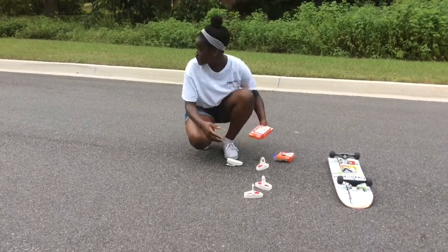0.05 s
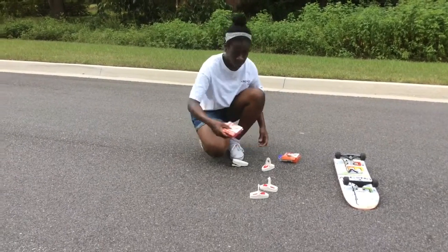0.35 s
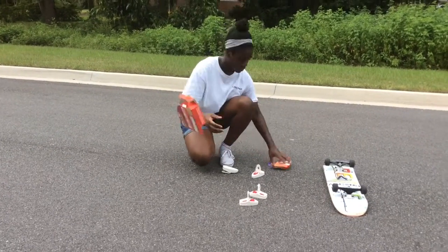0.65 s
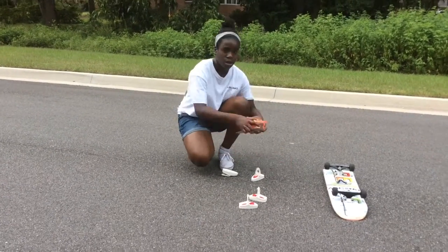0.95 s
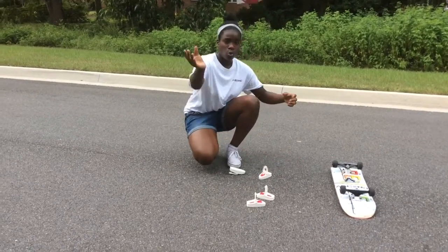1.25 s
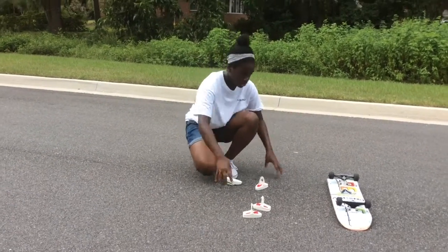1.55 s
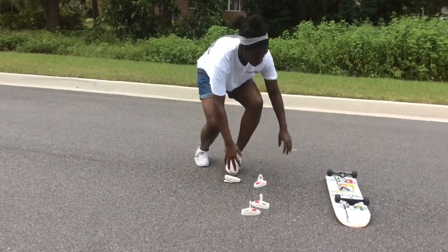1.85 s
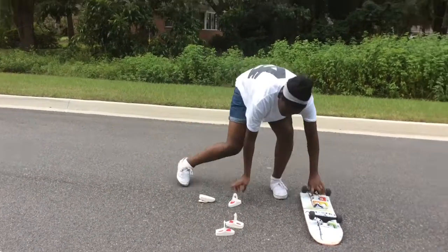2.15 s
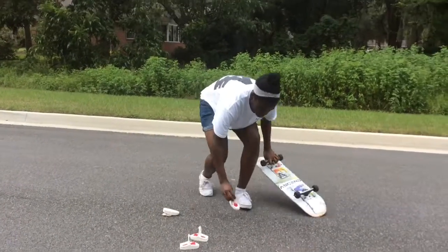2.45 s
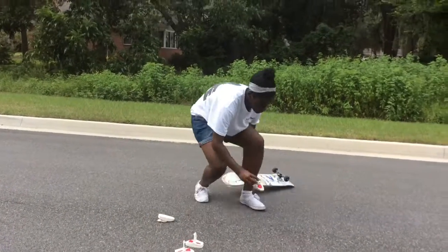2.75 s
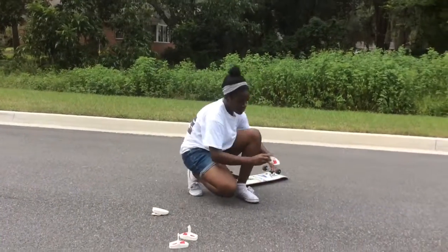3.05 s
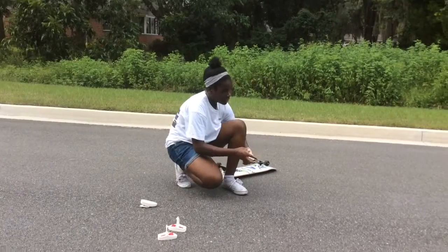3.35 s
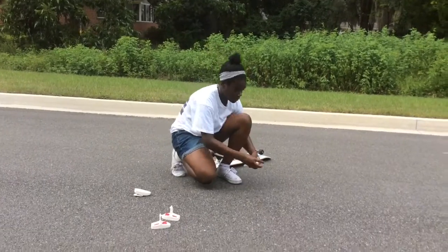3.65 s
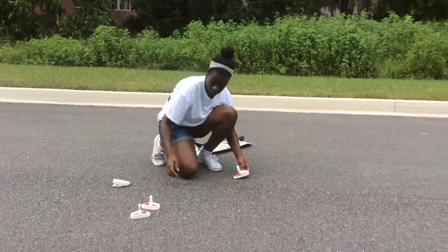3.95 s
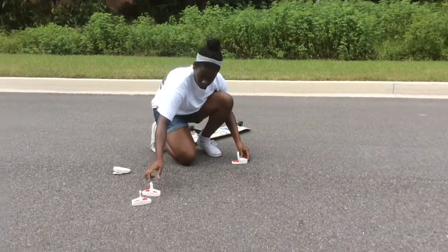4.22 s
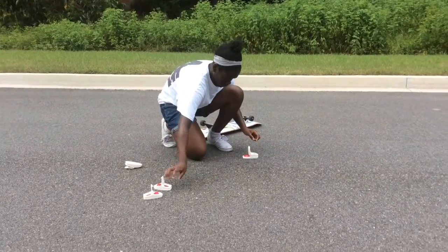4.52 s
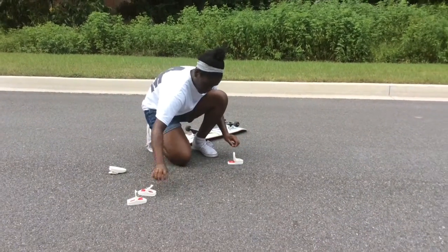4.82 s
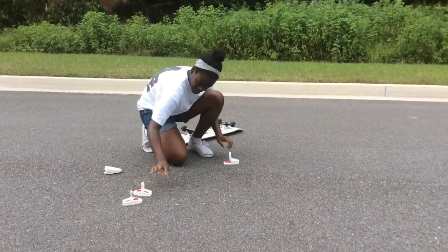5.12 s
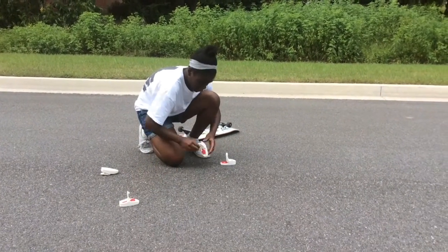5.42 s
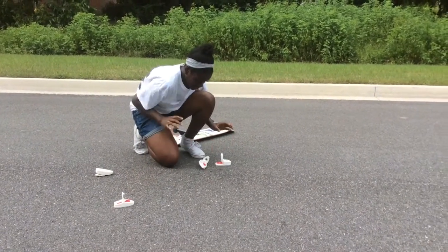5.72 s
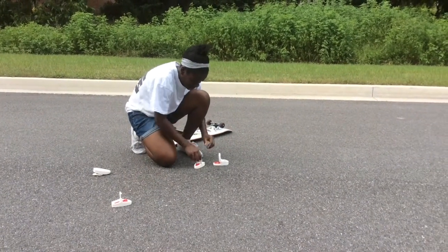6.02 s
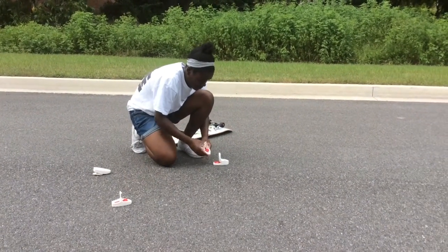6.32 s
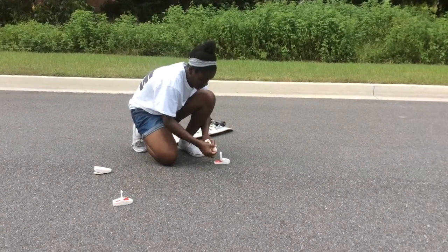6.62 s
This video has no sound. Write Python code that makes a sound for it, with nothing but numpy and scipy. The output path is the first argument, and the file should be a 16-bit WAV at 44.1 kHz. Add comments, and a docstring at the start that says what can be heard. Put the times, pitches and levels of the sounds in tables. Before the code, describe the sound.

On a quiet asphalt road, a few metres from the microphone, packets and plastic snap traps rattle briefly. Two empty packets land and bounce, one after the other. Shoes scuff faintly, then a skateboard is dragged with a gritty scrape and set down with a ringing knock. The traps then give scattered sharp clicks as they are handled. Distant traffic, a low engine hum and shrill insects continue underneath.

```python
"""A quiet asphalt road, a phone's microphone a few metres from someone crouching to lay out snap traps.
Far traffic, a low engine hum and insects in the verge are there from start to end. Packets and plastic
traps rattle as they are picked up, and two empty packets, tossed aside, land and bounce. Shoes scuff,
then a skateboard is dragged away, stones jolting its deck, and is set down near 3 s. From there on the
traps click as they are handled, each contact ringing shell and spring."""
import sys
import numpy as np
from scipy import signal
from scipy.fft import rfft, irfft
from scipy.io import wavfile
from scipy.ndimage import uniform_filter1d

SR = 44100
rng = np.random.default_rng(int(sys.argv[2]) if len(sys.argv) > 2 else 0)


def dump_mix(stems):
    """Bounce the given channels to the path in sys.argv[1] as a 16-bit WAV at rate SR."""
    frames = np.atleast_2d(stems).T  # one column per channel
    limited = np.clip(frames, -1, 1)  # hard clip at full scale
    pcm = np.round(limited * 32767).astype(np.int16)
    wavfile.write(sys.argv[1], SR, pcm)


N = 298998
TIME = np.arange(N) / SR

# colour of a bare contact with the road, for shoes and skateboard: f/Hz, level/dB
ROAD_CONTACT = [(120, -24), (300, -11), (900, 4), (2700, -5), (3300, -9), (5000, -13.5), (5900, -27),
                (7000, -21), (9000, -24.5), (11000, -37), (15500, -42)]


def undb(db):
    """Decibels to gain."""
    return 10 ** (np.asarray(db) / 20)


def unit(x):
    """Scale to rms 1."""
    return x / np.sqrt(np.mean(x ** 2))


def bump(s, half_length):
    """A smooth rise and fall about time s, top 1."""
    return np.exp(-((TIME - s) / half_length) ** 2)


def swells(table):
    """The rise in dB that a list of swells gives."""
    return sum(db * bump(s, half_length) for s, half_length, db in table)


def walk(rate):
    """Random levels held 1 / rate s and smoothed twice; spread near 1."""
    hold = int(SR / rate)
    steps = np.repeat(rng.standard_normal(N // hold + 1), hold)
    return 1.197 * uniform_filter1d(uniform_filter1d(steps, hold), hold)[:N]


def response(colour, modes=(), modes_db=0, tilt_db=0, size=4096):
    """Causal response of unit energy: a broad colour with resonances on it, tilted per octave."""
    hz = np.maximum(np.fft.rfftfreq(size, 1 / SR), 1)
    points, db = np.transpose(colour)
    power = undb(np.interp(np.log(hz), np.log(points), db)) ** 2
    for centre, width, mode_db in modes:
        power += undb(mode_db + modes_db) ** 2 / (1 + 2 * ((hz - centre) / width) ** 2) ** 2
    octaves = np.log2(np.clip(hz, 500, 9000))
    cepstrum = irfft(np.log(power) / 2 + np.log(undb(tilt_db * octaves)))
    cepstrum[1:size // 2] *= 2  # fold to minimum phase
    cepstrum[size // 2 + 1:] = 0
    ring = irfft(np.exp(rfft(cepstrum)))
    return ring / np.linalg.norm(ring)


def through(x, ring):
    """Play x through a response."""
    return signal.fftconvolve(x, ring)[:len(x)]


def band(x, low_hz, high_hz, order=3):
    """Band-pass."""
    sos = signal.butter(order, [low_hz, min(high_hz, .45 * SR)], "band", fs=SR, output="sos")
    return signal.sosfilt(sos, x)


def noise(colour):
    """Steady noise of a given colour, rms 1."""
    return unit(through(rng.standard_normal(N), response(colour)))


def grains(count, spread_db):
    """Dense tiny grains of uneven size, rms 1."""
    return unit(rng.standard_normal(count) * undb(spread_db * np.clip(rng.standard_normal(count), -2, 2)))


def contacts(table, colour, modes, modes_db, ring_db, ring_width_hz, peak, spread_db, fall, size=16384):
    """Softened clicks: each a grainy swell that rises to one peak, fades about as fast, rings the body."""
    out = np.zeros(N + 2 * size)
    t = (np.arange(size) - size // 2) / SR
    for s, db, tilt_db, rise_ms, ring_hz in table:
        slope_s = rise_ms / 1000 * np.where(t < 0, 1, fall)  # fall is decay time over rise time
        click = grains(size, spread_db) * np.exp(-np.abs(t) / slope_s)
        click[size // 2] += peak * np.linalg.norm(click)
        # the point of contact decides which resonance is struck hardest
        body = response(colour, [*modes, (ring_hz, ring_width_hz, ring_db)], modes_db, tilt_db)
        start = int(s * SR)
        out[start:start + size] += undb(db) * through(click, body)
    return out[size // 2:size // 2 + N]


def traffic():
    """Far roads rumble and hiss as vehicles pass; one engine hums with a wavering pitch."""
    # the engine hum swells: t/s, half length/s, rise/dB
    engine_swells = [(1.15, 0.5, 10), (3.9, 0.6, 6), (5.15, 0.47, 9)]
    # vehicles at their nearest: t/s, half length/s, rumble rise/dB, tyre rise/dB
    passes = [(0.536, 0.95, 7.5, 5), (6.35, 0.59, 1.5, 2.06)]
    # colours of the rumble and of the tyres from far off: f/Hz, level/dB
    rumble_colour = [(20, -17), (32, -12.5), (48, -3.5), (65, -3), (85, 0), (115, -1.5), (150, -12),
                     (220, -18.5), (400, -54.5)]
    tyre_colour = [(70, -26), (130, -3.5), (190, -4.5), (290, -10.5), (420, -12), (560, -13.5), (750, -9),
                   (1050, -9.5), (1800, -13.5), (2660, -20.5), (3600, -23.5), (5000, -21.5), (7000, -31),
                   (9100, -71)]
    engine_hz = 81.3 * (1 + 0.0316 * walk(9))
    phase = 2 * np.pi * np.cumsum(engine_hz) / SR
    engine = np.sin(phase) * undb(-64.5 + swells(engine_swells) + 2 * walk(9))
    rumble_rise = swells([(s, half, db) for s, half, db, _ in passes])
    tyre_rise = swells([(s, half * 1.77, db) for s, half, _, db in passes])  # tyres stay audible longer
    rumble = noise(rumble_colour) * undb(-61 + rumble_rise + walk(8))
    tyres = noise(tyre_colour) * undb(-62 + tyre_rise + 0.35 * walk(4.5))
    return engine + rumble + tyres


def insects():
    """A shrill, throbbing chorus in the verge; one insect nearer the microphone lisps in fading runs."""
    # colour of the chorus: f/Hz, level/dB
    chorus_colour = [(5500, -28), (7000, -17.5), (7800, -9), (8350, -0.5), (8850, -8), (9450, -6.5),
                     (10100, -20), (11500, -32), (15000, -57.5)]
    # the chorus swells: t/s, half length/s, rise/dB
    chorus_swells = [(0.45, 0.7, 5), (1.85, 0.32, 5), (4.75, 0.11, 2.5)]
    # the nearer insect's runs: t/s, length/s, stroke period/s, first stroke's level/dB
    lisp_runs = [(1.926, 0.28, 0.11, -69), (3.354, 0.88, 0.13, -59), (4.932, 0.22, 0.145, -65)]
    chorus_db = -62.5 + swells(chorus_swells)
    chorus = noise(chorus_colour) * undb(chorus_db + 0.87 * walk(45))
    core = unit(band(rng.standard_normal(N), 8000, 8570, order=2))
    throb = core * undb(chorus_db - 11.5 + 4 * walk(25))
    fade_db_per_s = 11
    strokes = sum(undb(db - fade_db_per_s * after) * bump(s + after, half_length=0.032)
                  for s, length, period, db in lisp_runs for after in np.arange(0, length, period))
    lisps = strokes * unit(band(rng.standard_normal(N), 6450, 8000, order=2))
    return chorus + throb + lisps


def packets():
    """Two empty packets are picked up and tossed; they ring briefly as they land and bounce."""
    # packet contacts: t/s, level/dB, tilt/(dB per octave), rise/ms, struck resonance f/Hz
    hits = [(0.004, -44, 7, 9.2, 2300), (0.042, -46, 2, 12.5, 1055), (0.727, -53.5, 1, 17.8, 3150),
            (0.872, -25, 0.6, 7.9, 2570), (0.898, -23, 1.6, 6.3, 2100), (0.918, -40.5, -1, 15, 1390),
            (0.960, -49.5, 0, 6.9, 2400), (1.150, -56, -5, 8.2, 3170), (1.657, -41, 13, 9, 8000),
            (1.676, -24.5, 1.4, 11.4, 1210), (1.687, -29.5, 4.5, 9.6, 7840), (1.775, -46.5, 2, 13, 2150)]
    # colour of the bare contact: f/Hz, level/dB
    colour = [(100, -10.5), (300, -6.5), (800, -2.5), (1150, 4), (2700, -3.5), (5200, -4), (6500, -9),
              (9400, -13.5), (10600, -33), (15500, -46)]
    # resonances of a packet: f/Hz, width/Hz, level/dB
    modes = [(423, 200, -4.5), (553, 190, -5), (1076, 260, 0.5), (1480, 540, -3), (2480, 260, 5.5),
             (3230, 350, 3.5), (4897, 380, -3.5), (7690, 420, -31)]
    return contacts(hits, colour, modes, modes_db=-1, ring_db=4, ring_width_hz=370,
                    peak=0.13, spread_db=5, fall=1.32)


def traps():
    """Plastic snap traps click in the hand, each contact ringing shell and spring."""
    # trap contacts: t/s, level/dB, tilt/(dB per octave), rise/ms, struck resonance f/Hz
    clicks = [(0.042, -38.5, 8.5, 11.6, 2410), (0.147, -41.5, 0.7, 18, 4430), (0.180, -39, 2.5, 10.7, 3310),
              (3.120, -57, 3, 14.2, 3280), (3.184, -50.5, 4.5, 18.5, 3260), (3.604, -42, 6, 11.7, 6980),
              (4.242, -36, -1, 8.7, 4110), (4.256, -54, 0, 19, 2290), (4.385, -57.5, -5, 18, 4450),
              (4.452, -57.5, -2, 8.8, 2553), (4.985, -59.5, -4, 11, 3430), (5.307, -48.5, 2, 15, 7140),
              (5.350, -59.5, 1, 12.5, 3300), (5.535, -48, 3, 14, 6630), (5.610, -57, 3.5, 23, 4160),
              (5.670, -54.5, 3, 15, 4960), (5.730, -43.5, 5, 15, 2520), (5.753, -28.5, 1.6, 9.3, 5046),
              (5.771, -35, 3.5, 15, 5160), (5.812, -50, 2, 16, 5000), (5.876, -38.5, 2, 13, 3387),
              (5.915, -50, 1.5, 14, 3550), (6.263, -51.5, 9, 14, 4530), (6.365, -61, 5, 11, 4560),
              (6.648, -44.5, 6.5, 13.6, 2550), (6.740, -46.5, 5.5, 13.4, 6700)]
    # colour of the bare contact: f/Hz, level/dB
    colour = [(200, -16.5), (600, -22), (1000, -16), (1650, -13.5), (2200, -2.5), (5200, 3), (6000, -9),
              (6900, -3), (9400, -8), (10500, -19.5), (13000, -19.5), (15500, -30.5)]
    # resonances of shell and spring: f/Hz, width/Hz, level/dB
    modes = [(2381, 488, 0.5), (2500, 130, -4), (3250, 290, -1), (4400, 320, -10), (4700, 253, -1),
             (5110, 316, -1), (6600, 440, -5.5), (8137, 470, -2.5), (8940, 580, -6.5)]
    return contacts(clicks, colour, modes, modes_db=5, ring_db=9.5, ring_width_hz=128,
                    peak=0.13, spread_db=3.5, fall=1.115)


def shoes():
    """Shoes shift on the asphalt: faint, short scuffs that hardly ring."""
    # scuffs: t/s, level/dB, tilt/(dB per octave), rise/ms, resonance f/Hz
    scuffs = [(1.965, -57.5, 5.5, 20, 3300), (2.030, -63, 5, 19, 2500), (2.085, -52, -9.5, 11, 600)]
    return contacts(scuffs, ROAD_CONTACT, modes=(), modes_db=-3, ring_db=-10.5, ring_width_hz=300,
                    peak=0.1, spread_db=2.5, fall=1)


def board_drag():
    """The skateboard grinds over asphalt: stones jolt the deck; boom and grit follow the pull's speed."""
    # colour of the scrape: f/Hz, level/dB
    colour = [(100, -40), (170, -12.5), (235, 2), (340, -2), (470, -7.5), (1030, 2), (1500, -5.5),
              (2690, -2), (2950, -6), (5100, -13), (5900, -22.5), (8600, -22.5), (11400, -42),
              (15400, -43.5)]
    # resonances of the dragged deck: f/Hz, width/Hz, level/dB
    modes = [(272, 95, -2), (614, 143, 1.5), (750, 47, 2), (1040, 130, -7.5), (1710, 35.6, 3),
             (1920, 83, 3.5), (2174, 72, 5.5), (2670, 66, 3.5), (4950, 320, -11), (8340, 330, -17)]
    # the board catches and one resonance sings out: t/s, f/Hz, width/Hz, level/dB, half length/ms
    catches = [(2.335, 1775, 1800, -43, 10), (2.405, 1720, 1000, -33.5, 28.5), (2.485, 1010, 400, -33, 7.6),
               (2.494, 3040, 1210, -32, 15), (2.555, 4440, 1200, -37.5, 24.5), (2.559, 263, 138.3, -38, 32),
               (2.645, 1324, 510, -39.5, 30), (2.700, 608, 40, -39, 69), (2.798, 3030, 1200, -47.5, 8.2)]
    pull_s = np.cumsum([2.2655, 0.1561, 0.14, 0.29])  # start, then speeding up, sliding, slowing
    speed = np.interp(TIME, pull_s, [0, 1, 1, 0])
    # the scrape brightens as the board tips onto its edge
    tipping_db = 23.5 * (np.clip(TIME, pull_s[0], pull_s[-1]) - np.mean(pull_s))
    stones = grains(N, spread_db=6) * undb(1.4 * walk(110))
    deck = through(stones, response(colour, modes, modes_db=-3.5))
    body = unit(band(deck, 574, 3250)) * undb(-30.5) * speed
    grit = unit(band(deck, 3030, 19000)) * undb(-38.5 + tipping_db) * speed
    boom = unit(band(deck, 165, 433, order=4)) * undb(-37) * speed ** 1.574  # grows faster than speed
    scrape = body + grit + boom
    for s, hz, width, db, half_ms in catches:
        ring = unit(band(stones, hz - width / 2, hz + width / 2, order=2))
        scrape += undb(db) * bump(s, half_ms / 1000) * ring
    return scrape


def board_set_down():
    """The skateboard knocks on the road and its deck rings."""
    # knocks: t/s, level/dB, tilt/(dB per octave), rise/ms, struck resonance f/Hz
    knocks = [(2.912, -27, 0.5, 6.62, 730), (2.922, -32, 1, 13, 1170), (2.940, -45.5, 3.5, 17, 2400),
              (3.030, -58, 8, 31, 1040)]
    # resonances of the deck: f/Hz, width/Hz, level/dB
    modes = [(274, 120, -14.5), (552, 94, -2), (715, 65, 3), (1085, 68, -1), (1403, 120, -8),
             (1890, 230, -11.5), (2493, 230, -9.5)]
    return contacts(knocks, ROAD_CONTACT, modes, modes_db=15, ring_db=-6, ring_width_hz=74,
                    peak=0.23, spread_db=1.5, fall=0.947)


def roadside(x, wet_db, t60):
    """Kerb, bushes and trees scatter a faint, dull tail back to the microphone."""
    t = TIME[:SR // 2]
    envelope = np.exp(-np.log(1000) * t / t60) * (1 - np.exp(-t / 0.022))
    tail = band(rng.standard_normal(len(t)), 300, 4900, order=1) * envelope
    return x + undb(wet_db) * through(x, tail / np.linalg.norm(tail))


def scene():
    """Far traffic and the verge behind everything handled a few metres from the microphone, in mono."""
    background = traffic() + insects()
    near = packets() + traps() + shoes() + board_drag() + board_set_down()
    return (background + roadside(near, wet_db=-32.5, t60=0.47))[None]


def record(dry):
    """The phone's microphone port hollows a narrow band of the treble, and the top is cut."""
    hollowed = dry - 0.46 * band(dry, 5740, 5890, order=1)
    top_hz = 15400
    return signal.sosfilt(signal.ellip(10, .2, 70, top_hz, fs=SR, output="sos"), hollowed)


dry = scene()
out = record(dry)
dump_mix(out)
```